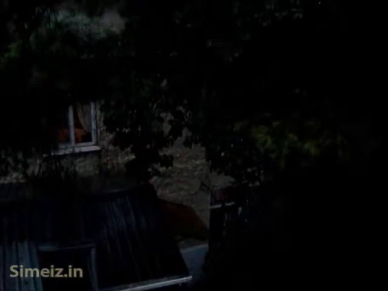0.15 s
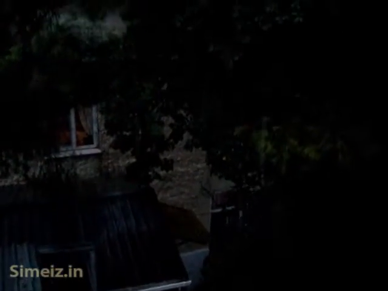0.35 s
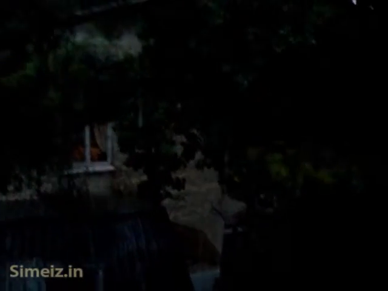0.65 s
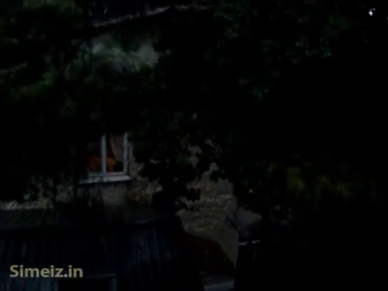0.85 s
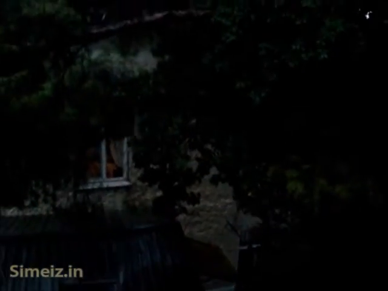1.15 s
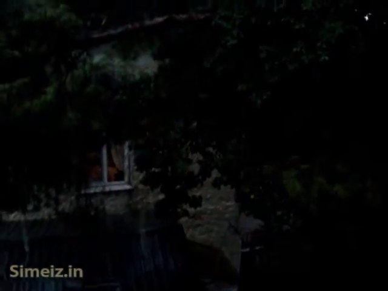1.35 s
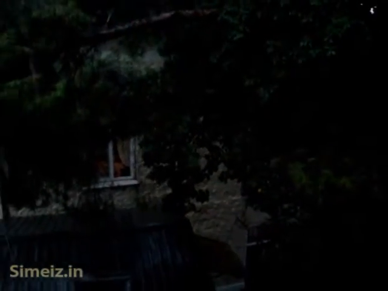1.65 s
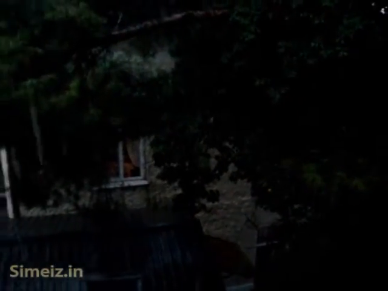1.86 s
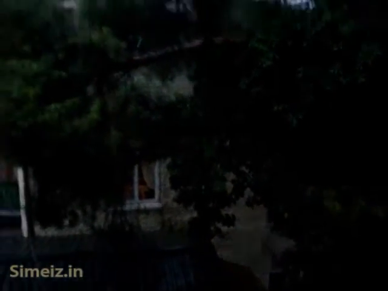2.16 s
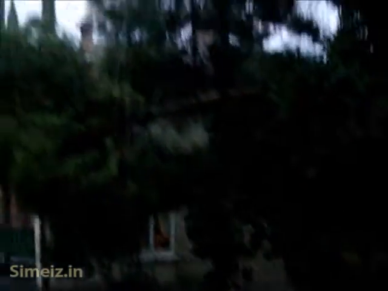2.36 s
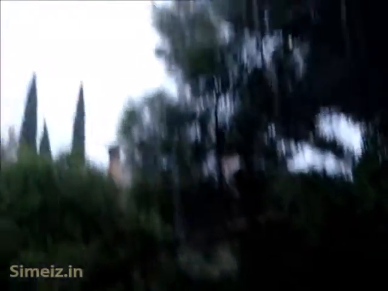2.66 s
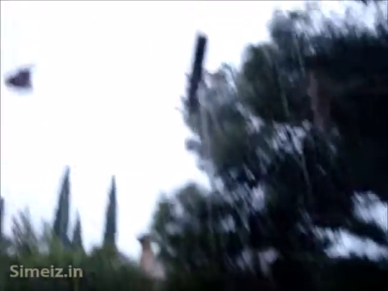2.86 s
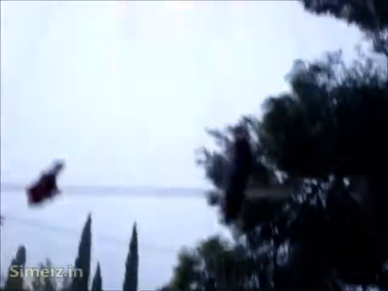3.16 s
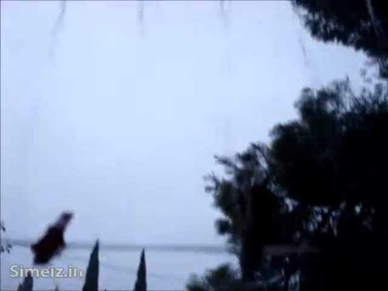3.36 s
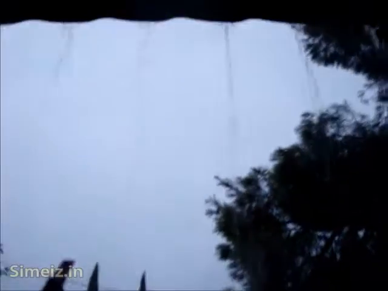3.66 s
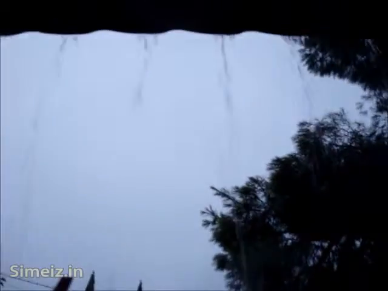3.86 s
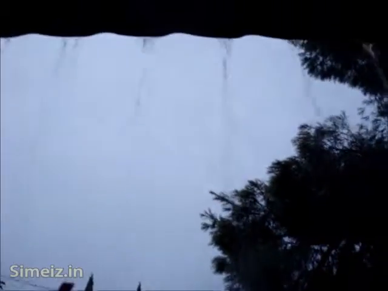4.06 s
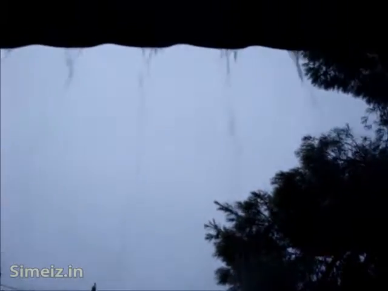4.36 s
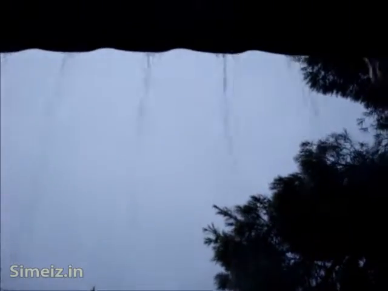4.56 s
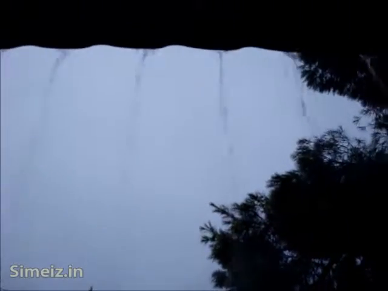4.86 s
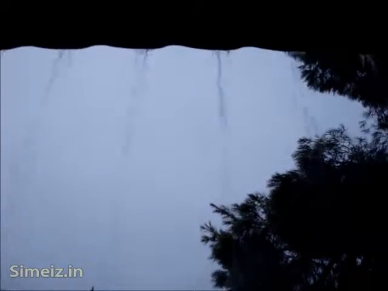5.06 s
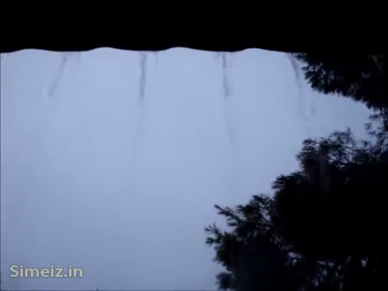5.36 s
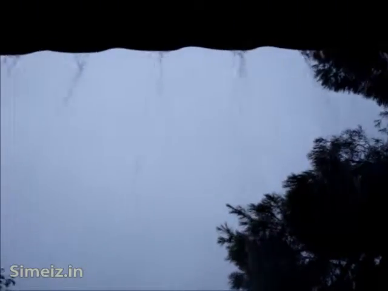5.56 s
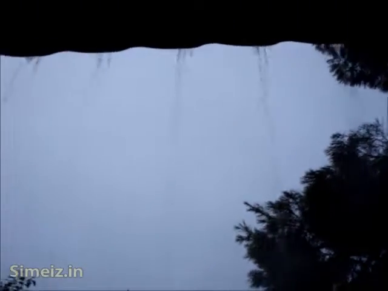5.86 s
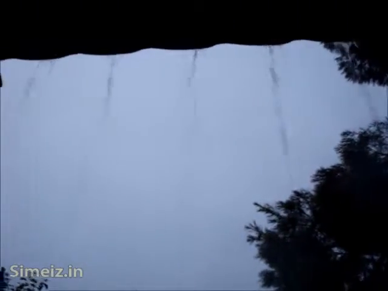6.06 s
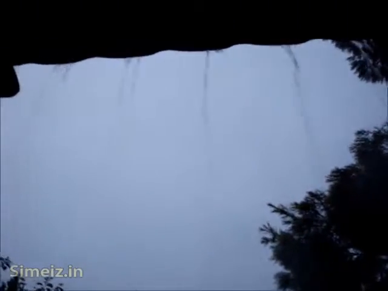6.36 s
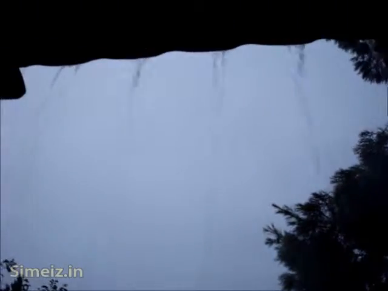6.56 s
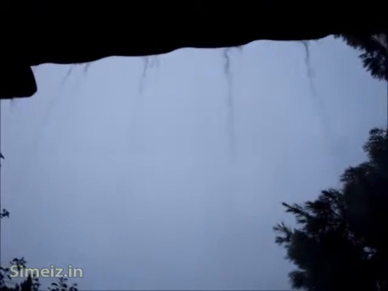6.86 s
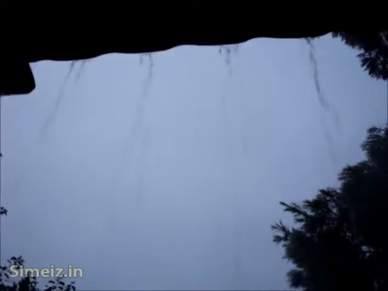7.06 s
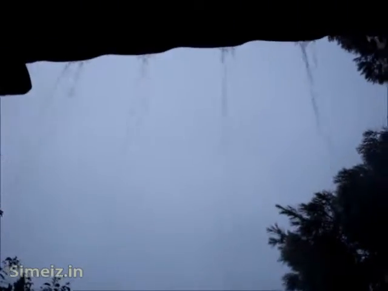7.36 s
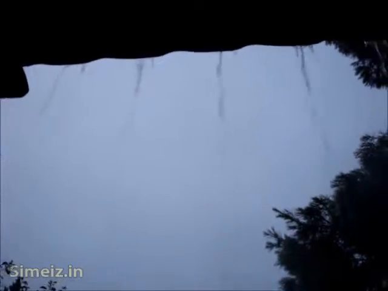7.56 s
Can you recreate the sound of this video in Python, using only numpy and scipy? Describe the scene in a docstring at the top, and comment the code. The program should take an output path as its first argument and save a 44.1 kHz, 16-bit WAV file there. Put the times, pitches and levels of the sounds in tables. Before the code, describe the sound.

Heavy rain drums steadily on a corrugated metal roof, with runoff spattering from the edge and a wash of rain on trees.

```python
"""Heavy rain on a corrugated metal roof, heard from under its edge, in mono.
Throughout, drops ring the sheet over the wash of rain on trees, near drops tick and runoff spatters;
the treble flickers and now and then dips briefly. Light gusts rumble at 0.45, 1.3 and 2.7 s,
the last with a deep treble dip. Near 3 s the breeze drops as the microphone turns up to the eave.
A tiny high tick follows at 6.9 s, a second deep dip at 7.6 s."""
import sys
import numpy as np
from scipy import signal
from scipy.fft import rfft, irfft
from scipy.io import wavfile
from scipy.ndimage import uniform_filter1d

SR = 44100
rng = np.random.default_rng(int(sys.argv[2]) if len(sys.argv) > 2 else 0)


def store_pcm(level_fs):
    """Save levels as 16-bit WAV."""
    pcm = np.round(np.clip(level_fs, -1, 1) * 32767).astype(np.int16)
    wavfile.write(sys.argv[1], SR, np.atleast_2d(pcm).T)


N = 340452

# roof sheet modes: pitch_hz, level_db, t60_s
SHEET_MODES = [(308, -13, 0.08), (360, -2.5, 0.075), (521, -3, 0.08), (615, -17, .04), (691.5, 0.5, 0.084),
               (787, 3.5, 0.035), (894, 5, 0.022), (1010, -3, 0.033), (1136, 4, 0.06), (1250, 2.5, 0.049),
               (1705, 5.5, 0.044), (2046, 2.5, .03), (2294, 8, 0.014)]
# relative spectrum of the wash: freq_hz, density_db
WASH_SPECTRUM = [(40, -43), (110, -36.5), (170, -18.5), (230, -12), (320, -4.5), (430, -4.5), (520, -0.5),
                 (1100, 0), (1450, -1.54), (2300, -4.5), (3200, -8), (5000, -13), (7500, -17.5),
                 (10000, -23)]
# downpour strength: time_s, gain_db
DOWNPOUR_CURVE = [(0, 0), (.55, -.9), (1.05, 0.23), (2.9, -0.04), (4.2, .5), (4.9, -.1), (6, 0.2),
                  (6.8, -0.76), (7.72, 0)]
# extra gain on the low drumming: time_s, gain_db
DRUMMING_CURVE = [(0, 0.5), (2.5, 1.2), (3.5, -1.8), (5.1, -0.1), (6.1, 1.3), (7.72, -0.5)]
# deep treble dips: centre_s, width_s, depth_db, above_hz
DEEP_TREBLE_DIPS = [(2.667, .027, 14, 5800), (7.566, .036, 17, 3900)]
# wind gusts: peak_s, width_s, level_db
WIND_GUSTS = [(.45, .22, -43), (1.333, .38, -42), (2.71, 0.19, -38)]
# relative spectrum of the wind: freq_hz, density_db
WIND_SPECTRUM = [(15, -17.5), (40, -13), (62, -6.5), (100, -.5), (145, 4.5), (200, 3.5), (600, -36),
                 (2000, -73)]


def roof(panel_drops_per_s=220, spread_db=3, detune=0.011, panels=12):
    """Drops strike several panels; each rings the sheet's modes in its own tuning and mix."""
    pitch_hz, level_db, t60_s = np.transpose(SHEET_MODES)[:, :, None]
    t, out = np.arange(SR // 10) / SR, np.zeros(N)
    decay = db_to_gain(level_db - 60 * t / t60_s)
    for _ in range(panels):
        offset, share = rng.standard_normal((2, len(SHEET_MODES), 1))
        modes = decay * np.sin(2 * np.pi * pitch_hz * (1 + detune * offset) * t)
        ring = (np.tanh(2 * share) * modes).sum(0)
        out += signal.oaconvolve(impacts(panel_drops_per_s, spread_db), ring)[:N]
    return coloured(out, [(60, -27), (280, -2)])  # a thin sheet radiates little bass


def wash(patch_db=0.56):
    """Countless far drops on trees and roofs merge into a roar with drifting patches."""
    def patches_db(hz, t):
        field = rng.standard_normal((len(t), len(hz))).T
        field = uniform_filter1d(field, size=9, axis=0)
        return patch_db * unit_rms(uniform_filter1d(field, size=30, axis=1))
    return coloured(shaped(rng.standard_normal(N), patches_db), WASH_SPECTRUM)


def near_drops(drops_per_s=240, spread_db=-1.0):
    """Close drops land as dry, wide-band ticks."""
    spectrum = [(60, -48), (200, -24), (900, -3), (2200, 0), (5000, -10), (10000, -13)]
    return coloured(impacts(drops_per_s, spread_db), spectrum)


def runoff(band_splats_per_s=110, spread_db=2.0, gush_db=5.5, cycles=2.5,
           low_hz=1500, high_hz=9500, tilt_db_per_octave=-3.0, bands=24):
    """Streams leave the eave in uneven gushes and burst into droplets a few cycles long."""
    gush = uniform_filter1d(rng.standard_normal(N), size=2600)
    gush = unit_rms(uniform_filter1d(gush, size=1100))
    splats_per_s = band_splats_per_s * db_to_gain(gush_db * gush)
    t, out = np.arange(SR // 50) / SR, np.zeros(N)
    for hz in np.geomspace(low_hz, high_hz, bands):
        age = hz * t / cycles
        droplet = age * np.exp(-2 * age) * np.sin(2 * np.pi * hz * t)
        spray = signal.oaconvolve(impacts(splats_per_s, spread_db), droplet)[:N]
        out += db_to_gain(tilt_db_per_octave * np.log2(hz / low_hz)) * unit_rms(spray)
    return coloured(out, [(60, -41), (700, -2)])


def swell_db(hz, t, surge_db=0.27, surge_band_hz=(1.45, 7),
             hiss_share=0.7, hiss_above_hz=2700, drumming_below_hz=580):
    """The downpour swells and eases, with small quick surges; the hiss follows only in part."""
    downpour_db = np.interp(t, *np.transpose(DOWNPOUR_CURVE))
    drumming_db = np.interp(t, *np.transpose(DRUMMING_CURVE))
    strength_db = downpour_db + surge_db * wander(*surge_band_hz, t)
    share = 1 + (hiss_share - 1) * above(hz, hiss_above_hz)
    return share * strength_db + drumming_db * (1 - above(hz, drumming_below_hz))


def treble_flicker_db(hz, t, flicker_db=-0.43, sink_db=11, threshold=0.49, above_hz=5600):
    """The top of the hiss flickers in small, quick patches; some sink far."""
    field = rng.standard_normal((len(t), len(hz))).T
    field = uniform_filter1d(field, size=13, axis=1)
    field = unit_rms(uniform_filter1d(field, size=3, axis=0))
    troughs = np.minimum(field + threshold, 0)
    return (flicker_db * field + sink_db * troughs) * above(hz, above_hz)


def treble_dips_db(hz, t, dips_per_s=1.4, dip_s=0.0097, dip_db=15, dip_above_hz=4900):
    """The treble sinks briefly: two deep dips, and shorter ones at random."""
    short_dips = [((k + rng.random()) / dips_per_s, dip_s, dip_db, dip_above_hz)
                  for k in range(round(t[-1] * dips_per_s))]
    return -sum(depth_db * np.exp(-(2 * (t - centre_s) / width_s) ** 4) * above(hz, above_hz)
                for centre_s, width_s, depth_db, above_hz in DEEP_TREBLE_DIPS + short_dips)


def wind(breeze_db=-50, shelter_db=-5, shelter_s=3, turn_s=0.5, buffet_db=1.5, buffet_band_hz=(5, 14)):
    """Gusts buffet the microphone; a faint breeze drops as it turns up to the eave."""
    t = np.arange(N) / SR
    sheltered = np.clip((t - shelter_s) / turn_s + 0.5, 0, 1)
    breeze = db_to_gain(breeze_db + shelter_db * sheltered)
    gusts = sum(db_to_gain(level_db) * np.exp(-(2 * (t - peak_s) / width_s) ** 2)
                for peak_s, width_s, level_db in WIND_GUSTS)
    buffet = db_to_gain(buffet_db * wander(*buffet_band_hz, t))
    return np.hypot(breeze, gusts * buffet) * coloured(rng.standard_normal(N), WIND_SPECTRUM)


def tick(start_s=6.892, pitch_hz=9200, level_db=-15, rise_s=0.0002):
    """One tiny high tick, perhaps a close drip."""
    t = np.maximum(np.arange(N) / SR - start_s, 0)
    age = t / rise_s
    return db_to_gain(level_db) * age * np.exp(1 - age) * np.sin(2 * np.pi * pitch_hz * t)


def impacts(rate_per_s, spread_db):
    """Random impulses; a few are louder (spread_db > 0) or softer (< 0) than the rest."""
    size = db_to_gain(spread_db * np.minimum(rng.exponential(1, N), 4))
    return size * rng.choice([-1, 1], N) * (rng.random(N) < rate_per_s / SR)


def wander(low_hz, high_hz, t, count=24):
    """Random drift between two rates; rms 1."""
    rates_hz = np.geomspace(low_hz, high_hz, count)[:, None]
    waves = np.sin(2 * np.pi * (rates_hz * t + rng.random((count, 1))))
    return unit_rms((waves / np.sqrt(rates_hz)).sum(0))


def coloured(x, spectrum):
    """Filter by (freq_hz, gain_db) points joined over log frequency; rms 1."""
    freq_hz, gain_db = np.transpose(spectrum)
    bin_hz = np.fft.rfftfreq(N, 1 / SR)
    bin_db = np.interp(np.log(bin_hz + 1), np.log(freq_hz + 1), gain_db)
    return unit_rms(irfft(rfft(x) * db_to_gain(bin_db), N))


def shaped(x, field_db, frame_samples=512):
    """Apply the gain field_db(hz, t)."""
    frames = dict(nperseg=frame_samples, noverlap=frame_samples - frame_samples // 4)
    hz, t, spectra = signal.stft(x, SR, **frames)
    return signal.istft(spectra * db_to_gain(field_db(hz[:, None], t)), SR, **frames)[1][:N]


def above(hz, edge_hz, steepness=8):
    """Smooth step from 0 to 1 around edge_hz."""
    return 1 - 1 / (1 + (hz / edge_hz) ** steepness)


def unit_rms(x):
    return x / np.sqrt(np.mean(x ** 2) + 1e-20)


def db_to_gain(db):
    return 10 ** (np.asarray(db) / 20)


def scene():
    """All rain under one swell, plus wind and tick; both channels alike."""
    spatter = db_to_gain(-34.5) * runoff() + db_to_gain(-31) * near_drops()
    rain = db_to_gain(-16) * wash() + db_to_gain(-25) * roof() + spatter
    rain = shaped(rain, swell_db)
    background = wind() + tick()
    rain = shaped(rain, lambda hz, t: treble_flicker_db(hz, t) + treble_dips_db(hz, t), frame_samples=128)
    mono = rain + background
    return np.array([mono, mono])


def record(dry, cutoff_hz=10050):
    """Steep low-pass."""
    lowpass = signal.firwin(1023, cutoff_hz, window=("kaiser", 9), fs=SR)
    return signal.oaconvolve(dry, lowpass[None], "same")


dry = scene()
out = record(dry)
store_pcm(out)
```